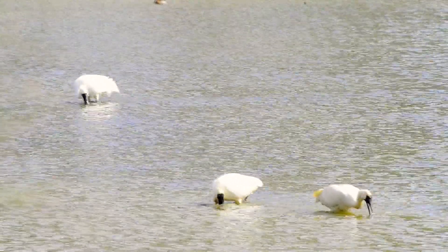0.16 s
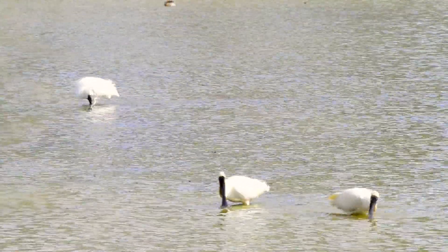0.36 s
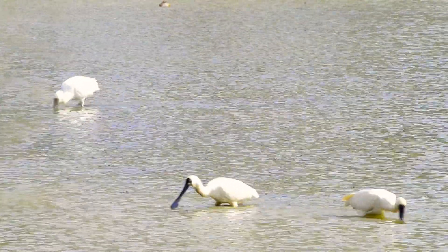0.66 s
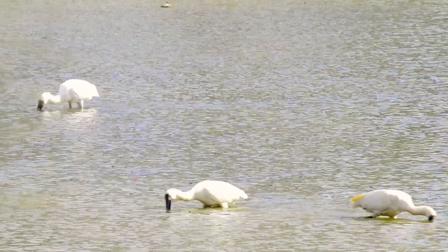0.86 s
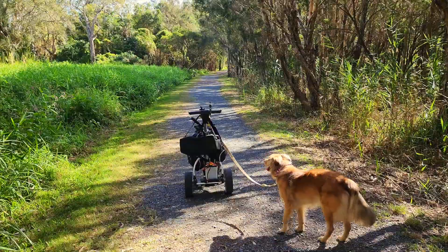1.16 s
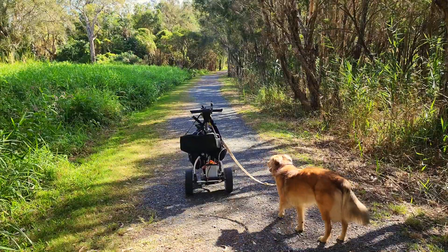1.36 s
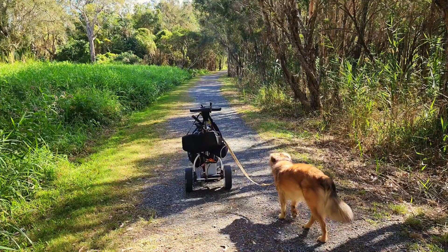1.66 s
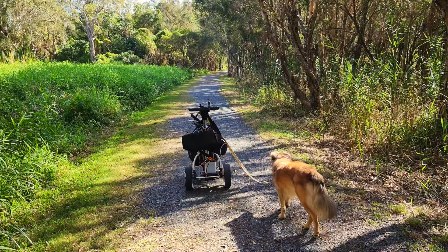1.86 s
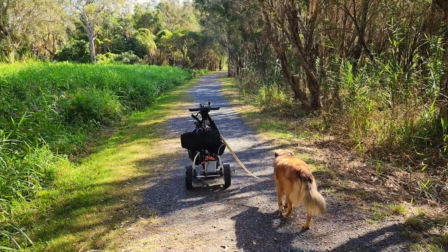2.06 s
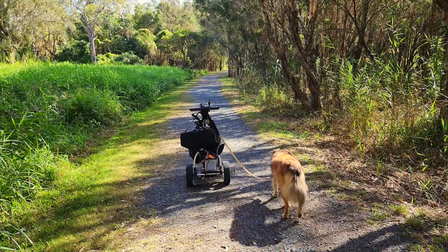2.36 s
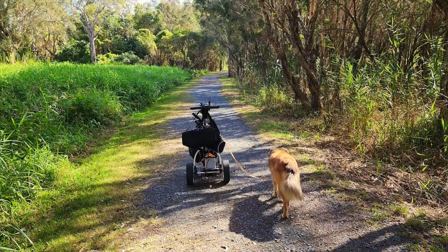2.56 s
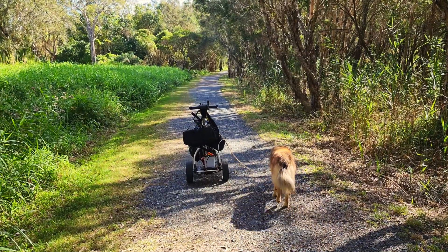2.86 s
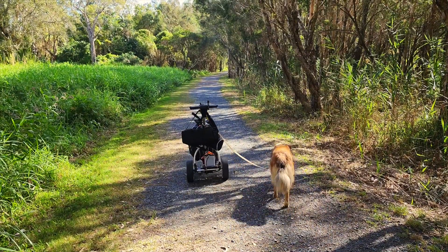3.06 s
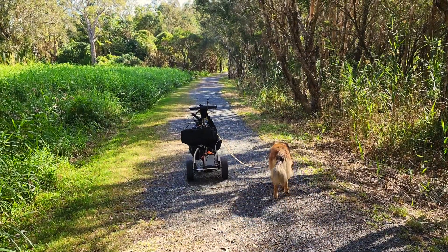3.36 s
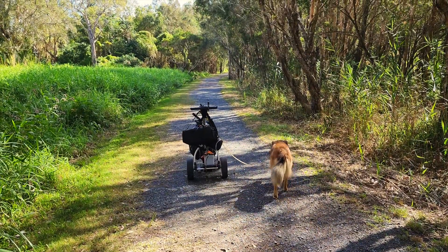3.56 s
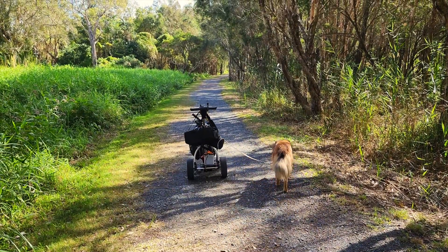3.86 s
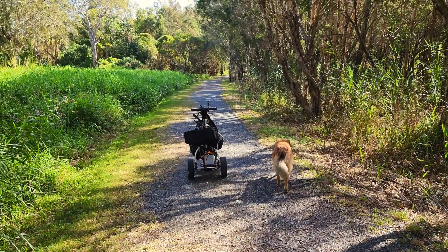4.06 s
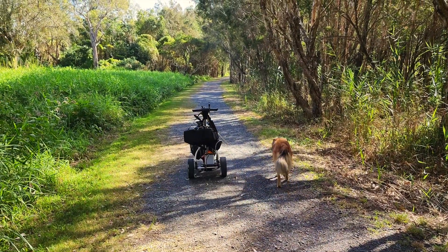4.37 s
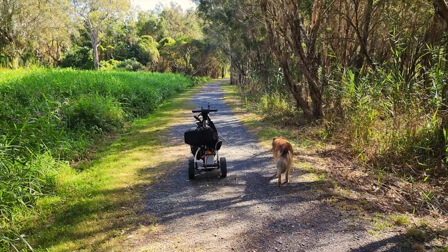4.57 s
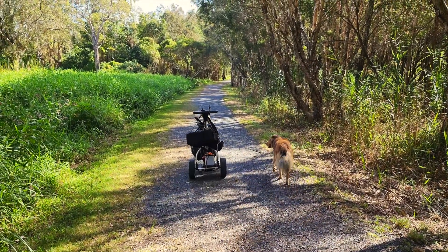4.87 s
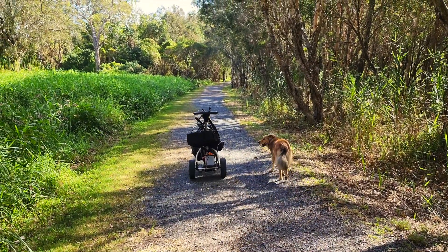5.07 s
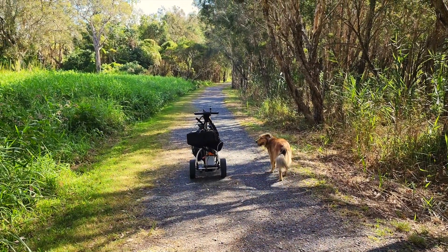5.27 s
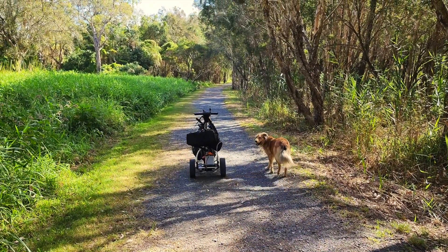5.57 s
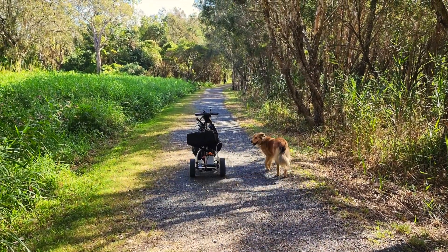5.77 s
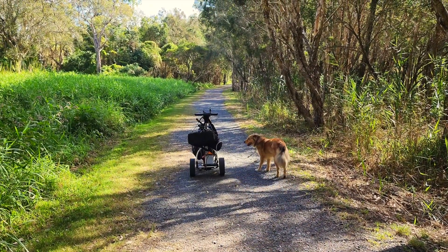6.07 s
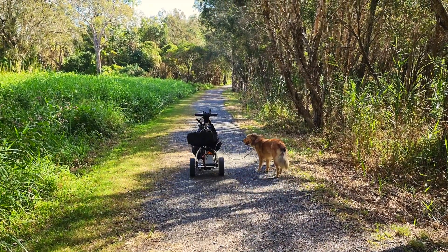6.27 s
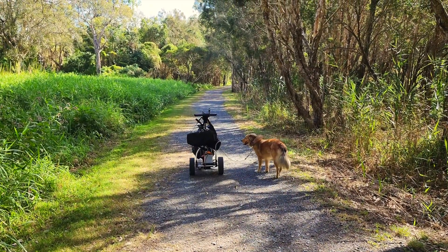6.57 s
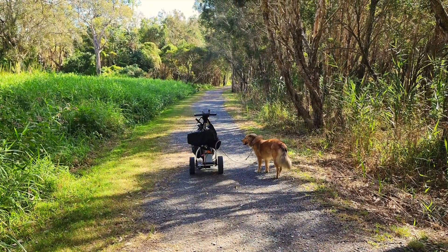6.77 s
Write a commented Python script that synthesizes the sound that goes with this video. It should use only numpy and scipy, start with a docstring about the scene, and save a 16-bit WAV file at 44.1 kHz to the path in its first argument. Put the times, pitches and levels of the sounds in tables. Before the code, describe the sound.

Outdoor birdsong with gaps: bright two-part chirps, chatter, sliding whistles and distant falling calls echo among trees over a very faint low rumble.

```python
"""A path through trees: small birds sing over each other, with quick swept chirps and chatter nearby,
thin whistles and trills higher up, and a fluting bird and a two-voiced falling call further off.
Each voice is a trembling near-sine swept in pitch and swelled in level; random echoes stand for trunks and
leaves. Under the birds lie shaped noise for a faint rumble and soft buffets, a far hum, and dull knocks
close to the microphone."""
import sys
import numpy as np
from scipy import signal
from scipy.fft import rfft, irfft, next_fast_len
from scipy.io import wavfile
from scipy.ndimage import uniform_filter1d

SR = 44100
rng = np.random.default_rng(int(sys.argv[2]) if len(sys.argv) > 2 else 0)


def bounce(signal):
    """Save signal as a 16-bit WAV file at the path given by the first command-line argument."""
    frames = np.transpose(np.atleast_2d(signal))
    limited = np.clip(frames, -1, 1)
    pcm = np.round(limited * 32767).astype(np.int16)
    wavfile.write(sys.argv[1], SR, pcm)


N = 304731
TIME = np.arange(N) / SR  # seconds

# near birds: a syllable is one sweep of pitch with a turn, under one swell of force, by name:
# [length_s, turn_share, start_hz, turn_hz, end_hz, loudest_share, rise_db, fade_db]
SYLLABLES = { "tsiew": (.072, .42, 2700, 3230, 1950, 0.26, 11, 22.3),
             "chew": (.058, .34, 2800, 3060, 2220, 0.086, 5.8, 13.6),
             "flick": (.024, .58, 2800, 4250, 3500, 0.43, 3.6, 6.4),
             "wit": (0.03, .7, 2850, 3800, 3600, 0.49, 22, 11),
             "rise": (.037, .8, 2220, 3300, 3400, 0.56, 29, 20.7),
             "peep": (.038, 0.39, 2220, 2400, 2270, 0.45, 8.9, 13),
             "tick": (.013, 0.402, 4500, 3420, 2200, 0.33, 24, 16),
             "whip": (.026, .27, 5200, 3350, 1860, 0.23, 10, 24.6),
             "hook": (.015, 0.47, 2800, 4100, 2900, 0.64, 8.7, 3.5),
             "dip": (0.0218, 0.35, 2840, 2650, 3000, 0.46, 5.4, 16),
             "zip": (0.024, 0.22, 4600, 5540, 3600, 0.19, 13, 7)}
# when each call is given, by call: [start_s, level_db]
CHATTER_CALL_TIMES = { "tsiew-it": [(.008, -28.5), (.221, -30), (4.884, -31), (5.097, -29.5),
                      (5.299, -29.5)], "chew-it": [(5.446, -34.5), (5.649, -32.5), (5.857, -35),
                      (6.067, -33)], "wit": [(4.758, -32.5), (5.516, -39), (5.627, -44), (5.938, -44)],
                      "see-saw": [(1.900, -37.5), (2.062, -38), (2.220, -37.5), (2.379, -38.5),
                      (2.537, -37.5), (2.712, -39.5), (2.890, -41.5), (3.062, -43.5)],
                      "peep": [(3.143, -39.5)], "tick": [(2.512, -37.5), (2.609, -38), (2.707, -38),
                      (2.806, -36.5), (2.908, -37.5), (3.011, -36), (3.120, -38), (3.237, -44.5),
                      (3.338, -40.5)], "whip": [(5.036, -34), (5.124, -30), (5.214, -30.5), (5.304, -29.5),
                      (5.396, -30)], "chup": [(3.369, -32), (3.498, -30.5), (3.786, -29.5), (3.917, -28)],
                      "chuwi": [(4.048, -31), (4.183, -29.5), (4.325, -32)], "zip": [(6.571, -37.5),
                      (6.828, -36.5)]}
# calls of more than one syllable, by call: [syllable name, delay_s, level_db]
PHRASES = { "tsiew-it": [("tsiew", 0, 0), ("flick", .093, -7)], "chew-it": [("chew", 0, 0),
           ("flick", .086, -14.5)], "see-saw": [("rise", 0, 0), ("peep", .099, -8)],
           "chup": [("hook", 0, -2.3), ("dip", .011, 0)], "chuwi": [("hook", 0, -2.5), ("dip", .011, 0),
           ("flick", 0.031, -5.5)]}
# how strongly the trees answer each call, by where its bird sits: [level_db]
SCATTER_DB = {"tsiew-it": -2.5, "chew-it": -12, "wit": -5, "see-saw": -8, "peep": -6.5, "tick": -4.5,
              "whip": -2, "chup": -2.5, "chuwi": -1.5, "zip": -3}
# how flat the first of a call is, halving with each repeat: [share of pitch]
WARM_UP = {"chup": .08, "see-saw": 0.045, "tick": .08}
# lag of the ground reflection: [shortest_s, longest_s]
GROUND_LAG_S = (.001, .004)
GROUND_DB, FIRST_ECHO_S = -7.5, .006
SYLLABLE_JITTER = .013  # random tremble, as a share of the pitch
EASE_POWER = 1.7  # how much a sweep slows after its turn

# thin whistles that slide down and settle: [start_s, length_s, start_hz, held_hz, loudest_share, level_db]
WHISTLES = [ (0, 0.053, 4717, 4646, 0, -30), (1.453, 0.17, 5770, 5385, 0, -45),
            (1.586, 0.085, 4696, 4490, 0.14, -45.5), (2.294, 0.046, 7800, 7490, 0.7, -55),
            (2.508, 0.082, 7500, 7300, 0.39, -58.5), (2.918, 0.06, 7350, 6940, 0.1, -52),
            (3.185, 0.12, 5120, 4845, 0.54, -57.5), (3.375, 0.16, 4160, 4000, 0.38, -46.5),
            (3.578, .13, 6180, 4560, .68, -22.5), (4.82, 0.057, 4610, 4560, 0.8, -38),
            (4.876, 0.025, 6460, 6050, 0.46, -34.5), (4.898, 0.075, 6340, 6310, 0.07, -43.5),
            (5.669, 0.087, 4600, 4410, .6, -53.5), (6.048, 0.069, 7300, 6960, 0.5, -54.5),
            (6.533, 0.067, 4560, 4417, 0.76, -33), (6.6, 0.2, 4310, 4305, 0.29, -31.5),
            (6.746, 0.084, 5920, 4650, 0.2, -33), (6.809, 0.055, 4230, 3990, 0.67, -27.5),
            (6.876, 0.058, 4610, 4370, 0.34, -23.5)]
WHISTLE_RISE_DB, WHISTLE_FADE_DB = 5, 10  # how far below its peak the swell starts and ends
SHARP_DB_PER_HZ = .006  # a whistle is weaker while still above its held pitch
WHISTLE_JITTER = .005  # share of the pitch
WAVER_DB = 2.1  # unsteady force of held notes

# fluting bird: [start_s, length_s, start_hz, held_hz, end_hz, loudest_share, level_db]
FLUTE = [ (0.018, 0.3, 1690, 1686, 1700, 0.36, -44), (3.197, 0.054, 1060, 1009, 1000, 0.52, -42),
         (3.235, 0.042, 1020, 848, 694, 0.1, -48.5), (3.596, 0.077, 1425, 1222, 1226, 0.36, -39.5),
         (3.746, 0.047, 1287, 1268, 1580, 0.67, -38.5), (4.297, 0.028, 1650, 1455, 1400, 0.75, -46),
         (4.35, 0.14, 1618, 1489, 1542, 0.22, -43.5), (4.542, 0.041, 1100, 1019, 1023, 0.6, -49),
         (4.722, 0.16, 1209, 1178, 1240, 0.33, -42), (5.223, 0.12, 1453, 1399, 1560, 0.52, -45)]
# its one reedy note: [start_s, length_s, start_hz, held_hz, end_hz, loudest_share, level_db]
REEDY = (3.824, 0.25, 1860, 1814, 1800, 0.5, -48.5)
# overtones of the reedy note: [multiple of pitch, level_db]
REEDY_OVERTONES = [(2, -4), (3, -10.5), (4, -12.5)]
# its one quavering note: [start_s, length_s, start_hz, held_hz, end_hz, loudest_share, level_db]
QUAVER = (3.512, 0.1, 1500, 1410, 1350, .6, -43)
FLUTE_RISE_DB, FLUTE_FADE_DB = 8.5, 8
SETTLE_SHARE, SETTLE_POWER = .3, 1.6  # a note finds its pitch early
BEND_POWER = 5.84  # and bends away only at the very end
SWELL_POWER = 1.59  # roundness of the top of a swell

# falling calls: [start_s, pitch_share, handover_s, level_db, aftertone_db]
FALLING_CALLS = [(0.467, 1.012, 0.14, -44, -67.5), (1.66, 1.027, 0.185, -43.5, -53.5),
                 (2.736, .98, .13, -47, -50.5)]
# tones of the falling call; the lower side of the syrinx takes over near the end:
# [pitch_share, share of the handover time waited, length_s, loudest_share, rise_db, fade_db, level_db]
TWO_VOICES = [(0.98, 0.012, .27, 0.19, 19, 16.5, 2.5), (.835, 0.027, 0.19, 0.3, 9.5, 5.5, -12),
              (.815, 0.98, 0.19, 0.17, 16, 19.5, -1)]
# sliding tone that ends the falling call: [delay_s, length_s, start_hz, end_hz]
AFTERTONE = (.222, .115, 2070, 1790)
# before the pitch shares: the pitch scoops up, then sags steadily
FALL_HZ, SAG_HZ_PER_S, SCOOP_HZ, SCOOP_S = 2000, 950, 280, .036

# runs of short pips, high trills overhead and one low pulsing note of the fluting bird:
# [start_s, end_s, pitch_hz, pips_per_s, level_db]
PIP_RUNS = [ (1.083, 1.24, 4956, 35, -61), (1.953, 2.148, 4980, 50, -60), (2.36, 3.217, 6007, 43, -51.5),
            (3.483, 3.6, 5250, 25.5, -46.5), (4.189, 4.36, 5215, 32, -53), (4.899, 5.083, 1194, 36, -46.5),
            (4.995, 5.099, 5055, 48.6, -42), (5.233, 5.31, 4970, 37, -42.5), (5.506, 5.542, 5690, 82, -44),
            (5.729, 6.0, 6016, 32, -55.5), (5.745, 5.93, 5210, 31, -52.5), (6.175, 6.37, 6034, 27, -64),
            (6.395, 6.534, 4940, 51, -64.5)]
RUN_RISE_DB, RUN_FADE_DB = 5, 1.5  # a run gathers force and eases a little at its end
# raspy notes and short blurred bits of whistle, before a common lift in level and flutter:
# [start_s, length_s, pitch_hz, flutter_hz, level_db]
FLUTTERED_NOTES = [ (0, 0.02, 5250, 300, -47), (2.775, 0.032, 4470, 301, -52.5),
                   (3.509, 0.13, 4090, 347.4, -50), (3.631, 0.08, 5390, 350, -44),
                   (3.612, 0.13, 1823, 130, -53), (4.436, 0.083, 6840, 372, -56),
                   (4.73, 0.051, 5600, 602, -46.5), (4.776, 0.099, 6190, 478, -51),
                   (4.748, .11, 3545, 302, -42), (5.44, .07, 6660, 220.2, -64),
                   (5.479, 0.066, 4910, 120.4, -57.5), (6.126, 0.035, 4730, 90, -55.5),
                   (6.559, 0.023, 6440, 199, -55), (6.81, 0.021, 6380, 148, -57)]
FLUTTER_SPEED_HZ = 450  # how fast the pitch flutters

# twittering deeper in the trees, level before scatter: [start_s, end_s, pitch_hz, spread_share, level_db]
TWITTERS = [(0.041, .28, 4750, 0.03, -52), (1.016, 1.18, 4110, 0.065, -69), (1.949, 2.6, 4066, 0.16, -67.5),
            (2.603, 2.8, 4400, .08, -61.5), (2.784, 3.15, 4706, 0.16, -54), (3.529, 3.66, 7090, 0.08, -60),
            (3.804, 4.2, 4274, .12, -52.5), (4.95, 5.299, 4507, 0.15, -49.5),
            (5.899, 6.27, 1084, 0.21, -68)]
# single chirps deeper in the trees, level before scatter: [start_s, pitch_hz, level_db]
FAR_CHIRPS = [(1.18, 2530, -73), (1.24, 2550, -74), (1.355, 2440, -75.5), (1.44, 4130, -64),
              (1.67, 4130, -59.5), (2.0, 2390, -49.5), (4.15, 4523, -48), (4.62, 2322, -64)]
FAR_CHIRP_S, FAR_CHIRP_RISE = .035, 0.059  # length, and share by which the pitch climbs

# soft knocks: [start_s, peak_db]
KNOCKS = [(2.08, -53.5), (2.691, -50.5), (2.758, -43), (2.808, -42.5), (2.875, -45), (2.905, -47),
          (3.815, -49.5), (5.064, -46.5), (6.411, -44)]
# relative spectrum of the knocks: [frequency_hz, level_db]
KNOCK_COLOUR = [(30, -49.5), (150, 4.5), (450, -0.5), (900, -15), (1700, -49.5)]
KNOCK_RISE_S, KNOCK_DECAY_S = 0.0054, .011

# soft buffets of air, before fluttering: [start_s, length_s, level_db]
BUFFETS = [(2.266, 0.6, -60.5), (2.757, 0.11, -57.5), (6.281, 0.2, -55), (6.665, 0.085, -59.5)]
# relative spectrum of the buffets: [frequency_hz, level_db]
BUFFET_COLOUR = [(41, -59), (70, -26.5), (172, 11.5), (328, 11.5), (1100, -25), (2000, -89)]
# relative spectrum of the distant rumble: [frequency_hz, level_db]
RUMBLE = [(22, -62), (125, -6.5), (466, -15), (1070, -22.5), (2500, -33), (6500, -40.5), (9620, -60)]
# rumble level through time, before its low part sways: [time_s, level_db]
RUMBLE_LEVEL = [(.25, -66), (1.4, -72.5), (2.7, -66.5), (6.9, -66)]
RUMBLE_SWAY_DB = 3
# far hum, before it wavers: [time_s, level_db]
HUM = [(4.6, -71), (5.3, -66.5)]

TRUNK_ECHOES_PER_S, LEAVES_DB = 750, -25
CUTOFF_HZ = 8100  # top of the recorder's range


def chatterers():
    """Near birds string syllables into quick phrases; they move as they sing, so each note echoes differently."""
    out = np.zeros(N)
    for call, times in CHATTER_CALL_TIMES.items():
        for name, delay, level_db in PHRASES.get(call, [(call, 0, 0)]):
            hz, db = syllable(*SYLLABLES[name])
            for k, (s, call_db) in enumerate(times):
                flatness = WARM_UP.get(call, 0) / 2 ** k
                pitch = hz * (1 - flatness + 0.0081 * rng.standard_normal())
                force_db = db + level_db + call_db + 2 * wander(len(db), speed_hz=150)
                sound = syrinx(pitch, force_db, jitter=SYLLABLE_JITTER, jitter_hz=372, fade_s=0.004)
                add(out, s + delay, sound)
                # mirrored by the ground
                add(out, s + delay + rng.uniform(*GROUND_LAG_S), sound * undb(GROUND_DB))
                echo = scatter(sound, t60=0.26) * undb(SCATTER_DB[call])
                add(out, s + delay + FIRST_ECHO_S, echo)
    return out


def whistlers():
    """High pure notes start sharp and settle as the syrinx relaxes; their force wavers."""
    out = np.zeros(N)
    for s, length, start_hz, held_hz, loudest, level_db in WHISTLES:
        part = progress(length)
        hz = settle(part, start_hz, held_hz)
        db = level_db + swell(part, loudest, WHISTLE_RISE_DB, WHISTLE_FADE_DB)
        db -= SHARP_DB_PER_HZ * (hz - held_hz)
        db += WAVER_DB * wander(len(hz), speed_hz=70)
        add(out, s, syrinx(hz, db, jitter=WHISTLE_JITTER))
    return trees(out, wet_db=-4.5, t60=0.39)


def fluter():
    """A larger bird flutes low notes; one quavers in pitch and force, and one is reedy with overtones."""
    out = np.zeros(N)
    for s, *note in FLUTE:
        add(out, s, syrinx(*flute_note(*note), jitter=0.006))
    s, *note = REEDY
    hz, db = flute_note(*note)
    add(out, s, syrinx(hz, db, jitter=0.0039, overtones=REEDY_OVERTONES, fade_s=0.013))
    s, *note = QUAVER
    hz, db = flute_note(*note)
    quaver_hz, depth_hz, depth_db = 68, 80, 4
    cycle = 2 * np.pi * quaver_hz * TIME[:len(hz)]
    add(out, s, syrinx(hz + depth_hz * np.cos(cycle), db + depth_db * np.sin(cycle)))
    return trees(out, wet_db=-5.0, t60=0.22)


def falling_caller():
    """Two sides of the syrinx overlap in slightly hoarse falling tones; a higher aftertone slides down last."""
    out = np.zeros(N)
    for s, pitch, handover_s, call_db, after_db in FALLING_CALLS:
        for share, waits, length, loudest, rise_db, fade_db, level_db in TWO_VOICES:
            part = progress(length)
            delay = waits * handover_s
            t = delay + part * length
            hz = pitch * share * (FALL_HZ - SAG_HZ_PER_S * t - SCOOP_HZ * np.exp(-t / SCOOP_S))
            db = call_db + level_db + swell(part, loudest, rise_db, fade_db)
            db += WAVER_DB * wander(len(t), speed_hz=70)
            add(out, s + delay, syrinx(hz, db, jitter=0.015, jitter_hz=353))
        delay, length, start_hz, end_hz = AFTERTONE
        part = progress(length)
        hz = start_hz + (end_hz - start_hz) * part
        db = after_db + swell(part, loudest=0.64, rise_db=7, fade_db=8.5)
        add(out, s + delay, syrinx(hz, db, jitter=.018, jitter_hz=353))
    return trees(out, wet_db=-7.0, t60=0.31)


def pips_and_flutters():
    """Uneven runs of falling pips, and raspy notes and blurred bits of whistle fluttering at random in pitch."""
    out = np.zeros(N)
    pip = np.linspace(1, -1, int(0.011 * SR))
    for start, end, hz, rate, level_db in PIP_RUNS:
        times = np.arange(start, end, 1 / rate)
        part = (times - start) / (end - start)
        force_db = level_db + swell(part, .5, RUN_RISE_DB, RUN_FADE_DB)
        unevenness = rng.standard_normal((len(times), 2))
        for s, db, (late, loud) in zip(times, force_db, unevenness):
            add(out, s + 0.003 * late, syrinx(hz * (1 + .012 * pip), db + 2 * loud))
    for s, length, hz, flutter_hz, level_db in FLUTTERED_NOTES:
        size = int(length * SR)
        # tanh bounds the flutter
        pitch = hz + 1.3 * flutter_hz * np.tanh(wander(size, speed_hz=FLUTTER_SPEED_HZ))
        db = level_db + 3.0 + 3 * wander(size, speed_hz=110)
        add(out, s, syrinx(pitch, db, fade_s=length / 3))
    return trees(out, wet_db=-2.5, t60=0.28)


def hidden_birds():
    """Loose twittering and chirps that arrive only by way of trunks and leaves, and so are blurred."""
    out = np.zeros(N)
    note = np.linspace(1, -1, int(FAR_CHIRP_S * SR))
    for start, end, hz, spread, level_db in TWITTERS:
        times = np.arange(start, end, len(note) / SR)
        looseness = rng.uniform(-1, 1, (len(times), 3))
        for s, (late, pitch, slope) in zip(times, looseness):
            sweep_hz = hz * (1 + spread * (pitch + slope * note / 2))
            add(out, s + 0.013 * late, syrinx(sweep_hz, level_db))
    for s, hz, level_db in FAR_CHIRPS:
        add(out, s, syrinx(hz * (1 - FAR_CHIRP_RISE * note / 2), level_db))
    return trees(out, wet_db=1.0, t60=0.17) - out  # the direct sound is taken away


def knocks():
    """Soft dull knocks close to the microphone, each a quickly damped thud of shaped noise."""
    out = np.zeros(N)
    t = TIME[:SR // 8]
    body = coloured(KNOCK_COLOUR)
    envelope = (1 - np.exp(-t / KNOCK_RISE_S)) * np.exp(-t / KNOCK_DECAY_S)
    for s, peak_db in KNOCKS:
        thud = body[int(s * SR):][:len(t)] * envelope
        add(out, s, thud * undb(peak_db) / np.abs(thud).max())
    return out


def air():
    """Outdoor floor: noise whose low rumble rises and sinks, a far hum and fluttering buffets of air."""
    return rumble() + hum() + buffets()


def rumble():
    """Distant rumble: shaped noise whose part below about 200 Hz sways at random."""
    floor = coloured(RUMBLE) * undb(np.interp(TIME, *np.transpose(RUMBLE_LEVEL)))
    low = signal.sosfilt(signal.butter(1, 200, fs=SR, output="sos"), floor)
    return floor - low + low * undb(RUMBLE_SWAY_DB * wander(N, speed_hz=29))


def hum():
    """Far hum: a low tone unsteady in pitch and level."""
    hum_hz = 175
    db = np.interp(TIME, *np.transpose(HUM)) + 3 * wander(N, speed_hz=26.0)
    return syrinx(np.full(N, hum_hz), db, jitter=0.095, jitter_hz=35.7)


def buffets():
    """Soft buffets of air: low noise under rounded gusts, fluttering at random."""
    gust = np.zeros(N)
    for s, length, level_db in BUFFETS:
        add(gust, s, undb(level_db) * np.hanning(int(length * SR)) ** .5)
    flutter_db = 2.8 * wander(N, speed_hz=56.0) - 1.0
    return gust * coloured(BUFFET_COLOUR) * undb(flutter_db)


def syrinx(hz, db, jitter=0.0085, jitter_hz=150, overtones=(), fade_s=0.0045):
    """A near-sine whose pitch trembles a little, with soft ends and optional overtones."""
    size = len(hz)
    phase = 2 * np.pi * np.cumsum(hz * (1 + jitter * wander(size, jitter_hz))) / SR
    tone = np.sin(phase)
    for multiple, level_db in overtones:
        tone = tone + undb(level_db) * np.sin(round(multiple) * phase)
    nearest_end = np.minimum(np.arange(size), np.arange(size)[::-1])
    fade = np.minimum(nearest_end / (fade_s * SR), 1)
    return tone * undb(db) * np.sin(np.pi / 2 * fade) ** 2


def syllable(length, turn, start_hz, turn_hz, end_hz, loudest, rise_db, fade_db):
    """Pitch and level of a quick sweep that leaves its one rounded turn fast and then eases off."""
    part = progress(length)
    turn = np.clip(turn, .05, .95)
    left = np.minimum((1 - part) / (1 - turn), 1)
    before_hz = start_hz + (turn_hz - start_hz) * part / turn
    after_hz = end_hz + (turn_hz - end_hz) * left ** EASE_POWER
    hz = np.where(part < turn, before_hz, after_hz)
    rounded_hz = uniform_filter1d(hz, size=110, mode="nearest")
    return rounded_hz, swell(part, loudest, rise_db, fade_db)


def flute_note(length, start_hz, held_hz, end_hz, loudest, level_db):
    """Pitch and level of a note that settles, holds and bends away as it ends."""
    part = progress(length)
    hz = settle(part, start_hz, held_hz) + (end_hz - held_hz) * part ** BEND_POWER
    return hz, level_db + swell(part, loudest, FLUTE_RISE_DB, FLUTE_FADE_DB)


def settle(part, start_hz, held_hz):
    """Pitch that starts sharp and settles as the syrinx relaxes."""
    return held_hz + (start_hz - held_hz) * np.exp(-(part / SETTLE_SHARE) ** SETTLE_POWER)


def swell(part, loudest, rise_db, fade_db):
    """Level in dB through a note: it rises to its loudest moment and fades."""
    loudest = np.clip(loudest, .02, .98)
    before = np.maximum(1 - part / loudest, 0)
    after = np.maximum((part - loudest) / (1 - loudest), 0)
    return -rise_db * before ** SWELL_POWER - fade_db * after ** SWELL_POWER


def progress(length):
    """The share of a note gone by, for each of its samples."""
    return np.linspace(0, 1, int(length * SR))


def trees(x, wet_db, t60):
    """A sound together with its scatter."""
    return x + undb(wet_db) * scatter(x, t60)[:N]


def scatter(x, t60, far_db=-37, far_t60=0.97, build_s=0.0036):
    """Trunk echoes and a haze from leaves build up and die fast; the deeper wood rings on faintly."""
    t = TIME[:SR]
    strength = rng.standard_normal(SR)
    trunks = rng.random(SR) < TRUNK_ECHOES_PER_S / SR
    near_decay = undb(-60 * t / t60)
    far_decay = undb(far_db - 60 * t / far_t60)
    echoes = strength * (undb(LEAVES_DB) + trunks) * (1 - np.exp(-t / build_s)) * (near_decay + far_decay)
    return signal.fftconvolve(x, echoes / np.linalg.norm(echoes))


def coloured(points):
    """Noise of rms 1 with a spectrum through (Hz, dB) points."""
    hz, db = np.transpose(points)
    bins_hz = np.fft.rfftfreq(N, 1 / SR)
    gain = undb(np.interp(np.log(bins_hz + 1), np.log(hz), db))
    noise = irfft(rfft(rng.standard_normal(N)) * gain, N)
    return noise / noise.std()


def wander(size, speed_hz):
    """Smooth random motion with spread 1."""
    span = next_fast_len(size + SR // 4, True)
    hz = np.fft.rfftfreq(span, 1 / SR)
    motion = irfft(rfft(rng.standard_normal(span)) * np.exp(-(hz / speed_hz) ** 2), span)
    return motion[:size] / motion.std()


def add(out, s, sound):
    """Mix a sound in at time s, cut where it passes either end."""
    i = int(round(s * SR))
    sound, i = sound[max(-i, 0):], max(i, 0)
    out[i:i + len(sound)] += sound[:max(N - i, 0)]


def undb(db):
    """Decibels to gain."""
    return 10 ** (np.asarray(db) / 20)


def scene():
    """All the birds over the knocks and the outdoor floor, in mono."""
    near = chatterers()
    higher_and_further = whistlers() + fluter() + falling_caller() + pips_and_flutters() + hidden_birds()
    mono = near + higher_and_further + knocks() + air()
    return mono[None]


def record(dry):
    """The recorder cuts the top steeply."""
    return signal.sosfilt(signal.ellip(8, .2, 60, CUTOFF_HZ, fs=SR, output="sos"), dry)


dry = scene()
out = record(dry)
bounce(out)
```